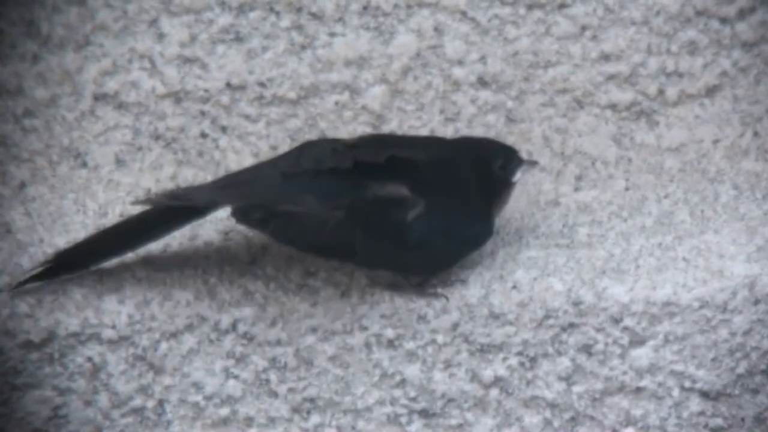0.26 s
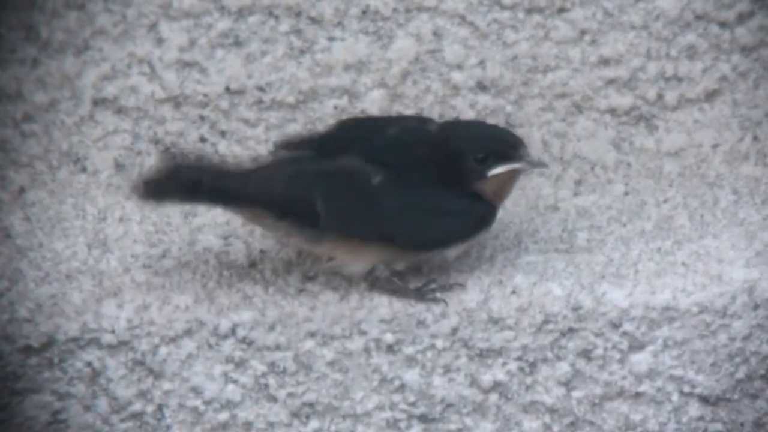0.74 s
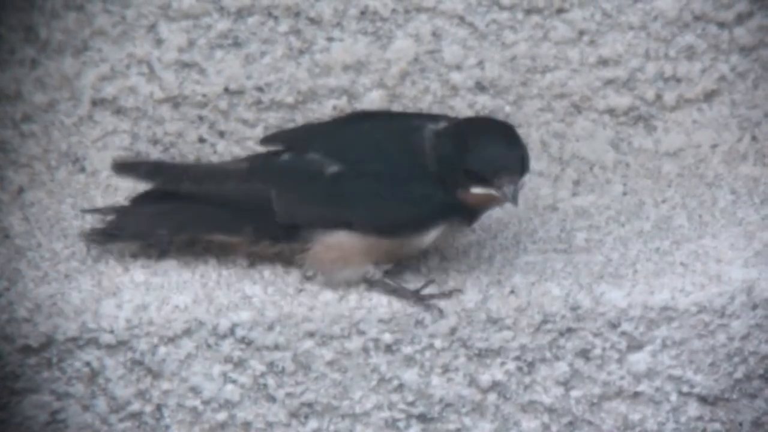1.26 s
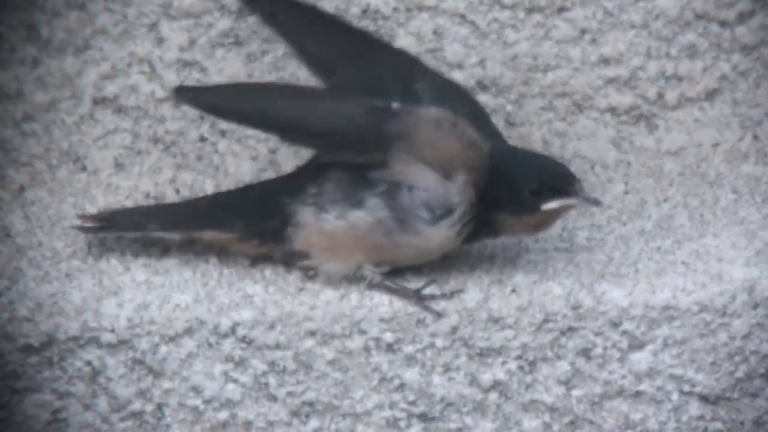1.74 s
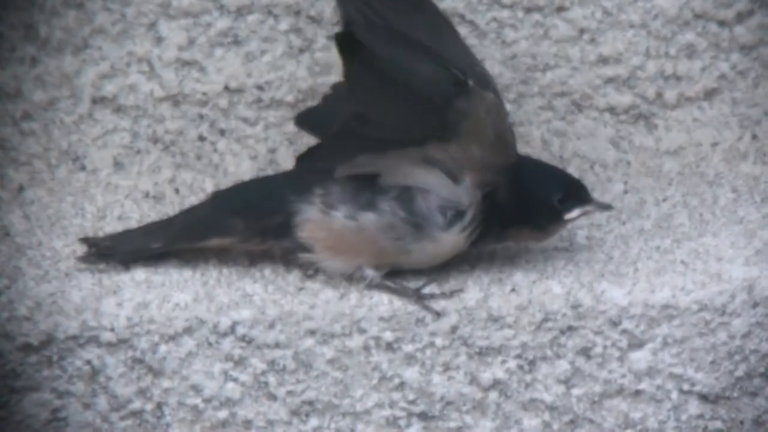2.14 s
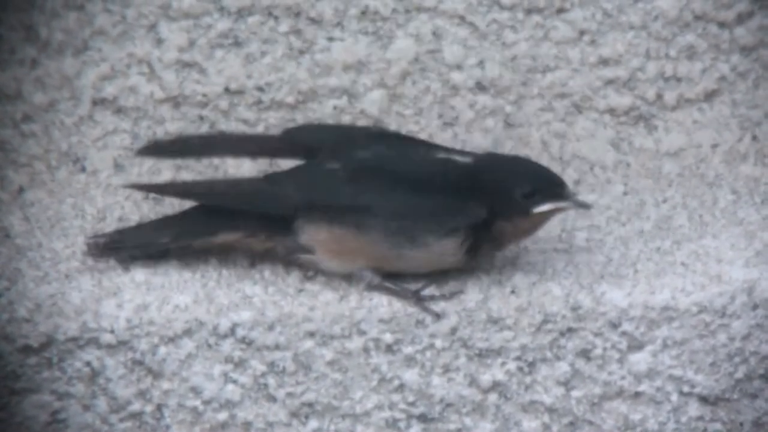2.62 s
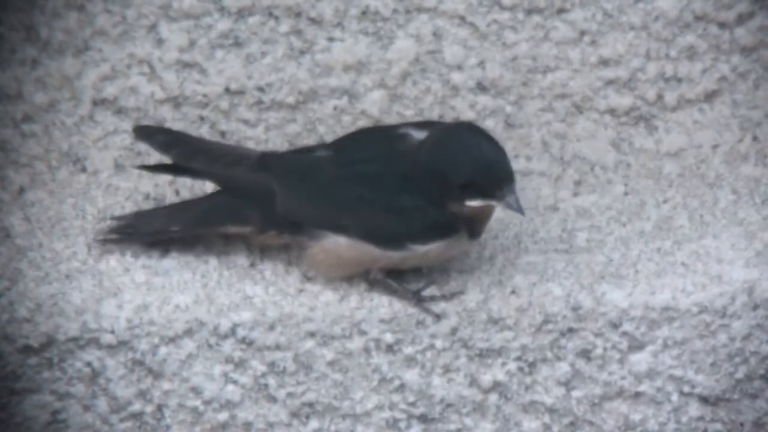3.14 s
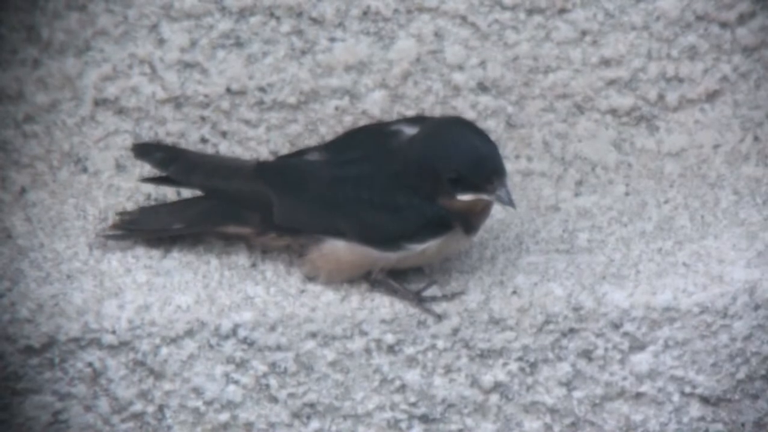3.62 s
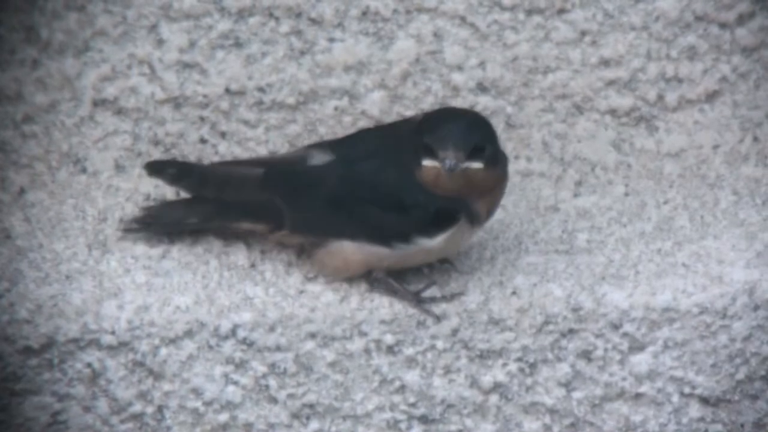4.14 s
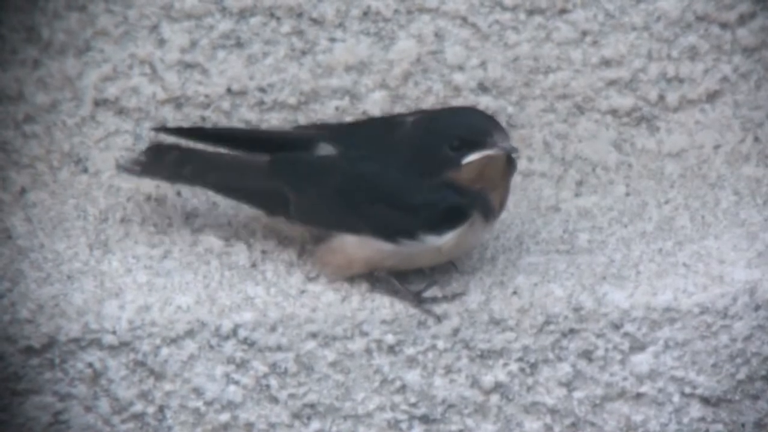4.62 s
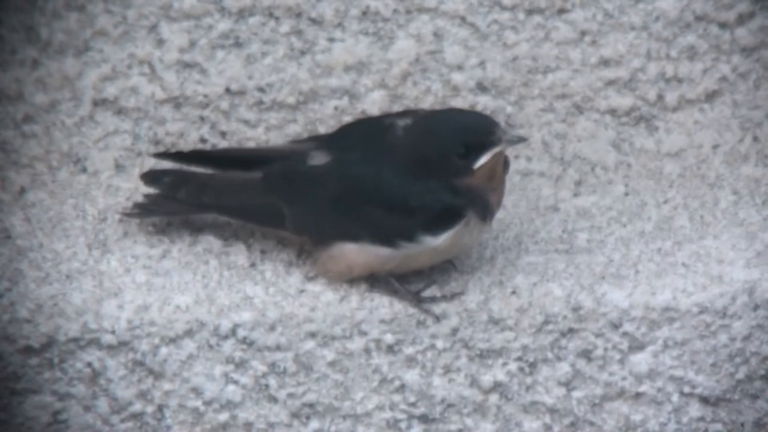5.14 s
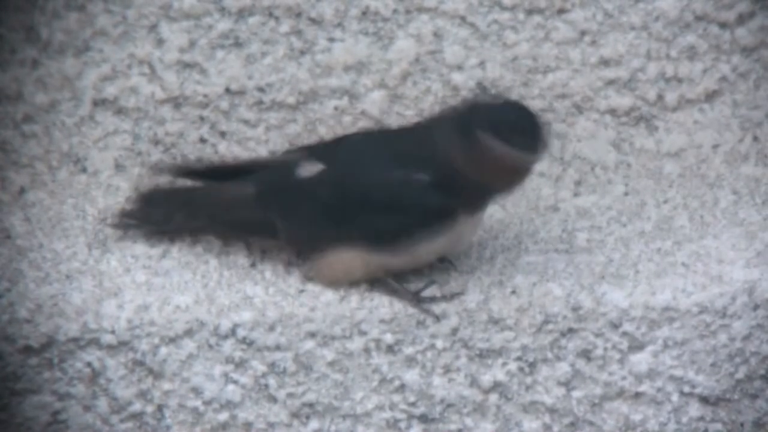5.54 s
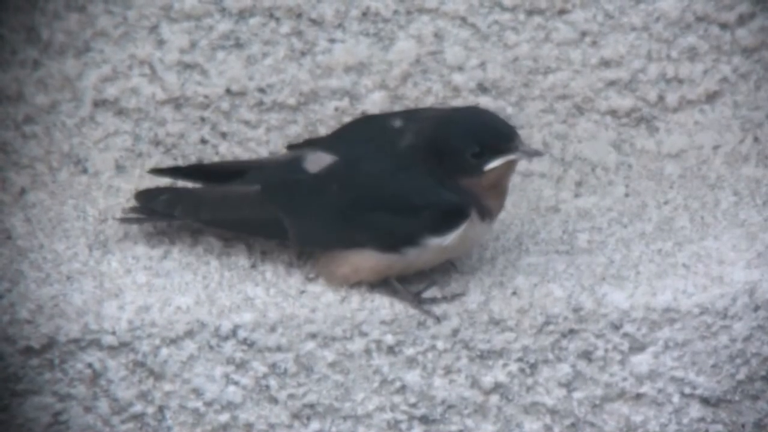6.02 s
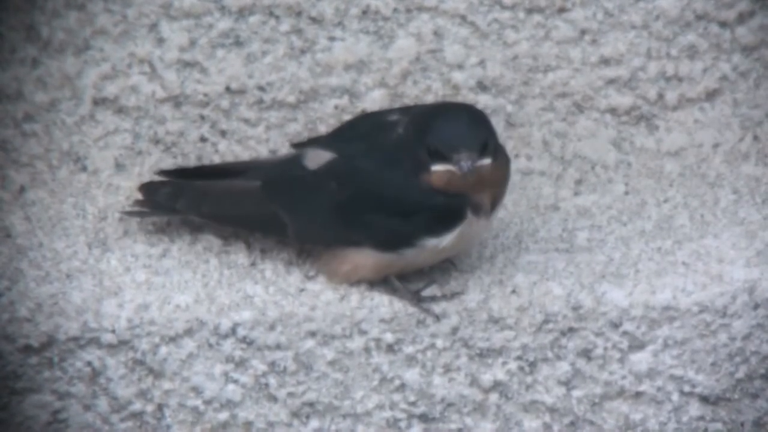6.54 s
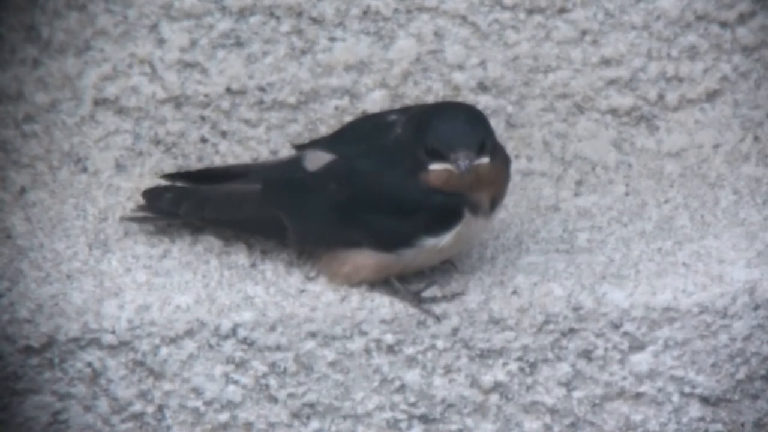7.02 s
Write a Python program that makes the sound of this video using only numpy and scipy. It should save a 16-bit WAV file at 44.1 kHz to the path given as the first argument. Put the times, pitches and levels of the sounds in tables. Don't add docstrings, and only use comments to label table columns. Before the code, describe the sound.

A young swallow gives a quick, high, falling three-note chirp about once a second over steady bright water hiss and faint distant bird whistles.

```python
import sys
import numpy as np
from scipy import signal
from scipy.fft import rfft, irfft
from scipy.io import wavfile
from scipy.ndimage import uniform_filter1d

SR = 44100
rng = np.random.default_rng(int(sys.argv[2]) if len(sys.argv) > 2 else 0)


def digitize_waveform(pressure):
    field = np.atleast_2d(pressure).T
    bounded = np.clip(field, -1, 1)
    quanta = np.round(bounded * 32767).astype(np.int16)
    wavfile.write(sys.argv[1], SR, quanta)


def gain_from_decibels(decibels):
    exponent = np.asarray(decibels, float) / 20
    return 10 ** exponent


N = 320607
TIME = np.arange(N) / SR


def colour(points, peaks=()):
    hz = np.maximum(np.arange(N // 2 + 1) * SR / N, 1)
    point_hz, point_db = np.transpose(points)
    db = np.interp(np.log(hz), np.log(point_hz), point_db)
    for centre_hz, width_hz, top_db in peaks:
        db = db + top_db * np.exp(-(2 * (hz - centre_hz) / width_hz) ** 2)
    noise = irfft(rfft(rng.standard_normal(N)) * gain_from_decibels(db), N)
    return noise / noise.std()


def walk(rate, size):
    hold = max(int(SR / rate), 1)
    steps = np.repeat(rng.standard_normal(size // hold + 1), hold)[:size]
    smooth = uniform_filter1d(uniform_filter1d(steps, hold), hold)
    return smooth / np.sqrt(.55)


def add(out, s, sound):
    i = int(s * SR)
    out[i:i + len(sound)] += sound[:len(out) - i]


def tone(hz):
    return 2 * np.pi * np.cumsum(hz) / SR


def bandpass(sound, low_hz, high_hz):
    return signal.sosfilt(signal.butter(2, [low_hz, high_hz], "bandpass", fs=SR, output="sos"), sound)


def drip(hz, db, t60):
    attack = .003
    t = np.arange(int((t60 + attack) * SR)) / SR
    size = np.minimum(t / attack, np.exp(-np.log(1000) * (t - attack) / t60))
    return gain_from_decibels(db) * size * np.sin(tone(hz * (1 + .03 * t / t60)))


# (f/Hz, level/dB per Hz)
WATER_SPECTRUM = [(35, -62), (60, -50), (328, -33.5), (700, -21.3), (1380, -14), (2060, -10), (2600, -4.7),
                  (3010, .9), (3500, -4.2), (3900, -4.4), (5000, -9.8), (8500, -16), (10000, -24.5),
                  (15600, -46.5)]
# (f/Hz, width/Hz, level/dB)
CAVITY_PEAKS = [(6100, 600, -2.8), (6750, 500, 1.4), (7500, 600, -2.6), (8200, 600, 1), (11100, 2200, -2.2)]
# (t/s, level/dB)
FLOW = [(0.0, -32.5), (1.33, -32.5), (2.6, -33), (5.04, -33), (6.82, -31.5), (6.96, -31), (7.27, -31.5)]
# (t/s, length/s, centre f/Hz, level/dB)
SPLASHES = [
    (.9, 0.088, 6500, -38),
    (1.587, 0.071, 3500, -33),
    (6.66, .07, 6950, -38),
    (6.919, 0.13, 6200, -38),
]
# (t/s, f/Hz, peak level/dB, t60/s)
DRIPS = [
    (.335, 2380, -27, .08),
    (2.575, 2350, -31, .05),
    (2.755, 1620, -36, .06),
    (5.604, 2750, -23, .03),
    (1.0315, 3000, -17, .011),
    (6.708, 2850, -21, .035),
    (6.913, 2500, -21, .04),
]


def water():
    hiss = rfft(colour(WATER_SPECTRUM, CAVITY_PEAKS))
    octave = np.log2(np.maximum(np.arange(len(hiss)) * SR / N, 1) / 1000)
    low = 1 / (1 + gain_from_decibels(40 * (octave - 1)))
    high = 1 / (1 + gain_from_decibels(40 * (2.3 - octave)))
    out = np.zeros(N)
    for band, slow_db, quick_db in ((low, .15, .2), (1 - low - high, .4, .8), (high, .4, .7)):
        flicker_db = slow_db * walk(2.75, N) + quick_db * walk(18, N)
        out += irfft(hiss * band, N) * gain_from_decibels(flicker_db)
    out = out * gain_from_decibels(np.interp(TIME, *np.transpose(FLOW)) + 2.5)

    for s, length, hz, db in SPLASHES:
        gust = bandpass(rng.standard_normal(int(length * SR)), hz * 0.74, hz * 1.25)
        add(out, s, gain_from_decibels(db) * gust / gust.std() * np.hanning(len(gust)))
    for when, pitch, size in rng.random((150, 3)):
        add(out, when * N / SR, drip(2750 + 500 * pitch, -35 - 2.2 * np.log(size + .01), .02))
    for s, hz, db, t60 in DRIPS:
        add(out, s, drip(hz, db, t60))
    return out


def hum():
    return gain_from_decibels(-70.5 + 1.6 + 2.7 * walk(4, N)) * np.sin(2 * np.pi * 498 * TIME)


# (f/Hz, level/dB per Hz)
SIDE_SPECTRUM = [(60, -50), (3000, -17), (5000, -8.5), (8500, -3.5), (11000, -11.5), (15600, -18.5)]


def side_hiss():
    return gain_from_decibels(-55.5) * colour(SIDE_SPECTRUM)


def yard(sound):
    t60_s, tail_db = .5, -6.5
    t = np.arange(int(.4 * SR)) / SR
    decay = np.exp(-np.log(1000) * t / t60_s) * np.minimum(t / .008, 1)
    tail = rng.standard_normal(len(t)) * decay
    response = np.append(1, gain_from_decibels(tail_db) * tail / np.linalg.norm(tail))
    return signal.fftconvolve(np.append(sound, 0 * t), response)[:len(t)]


# (t/s, length/s, first f/Hz, last
# f/Hz, level/dB)
WHISTLES = [(.372, 0.018, 4200, 4200, -30), (0.389, 0.033, 3550, 3980, -31.5),
            (1.43, 0.11, 4920, 4200, -41), (1.69, .15, 3900, 3480, -36), (1.84, .03, 4250, 4300, -38),
            (2.28, 0.18, 4280, 3820, -39.5), (3.24, .12, 4450, 5130, -42), (4.085, .028, 3550, 3970, -29),
            (4.32, .17, 5300, 5580, -50), (5.636, 0.0304, 3450, 3980, -30.5), (6.06, .05, 4480, 4340, -38),
            (6.2, 0.048, 3820, 3850, -37), (6.67, .125, 3910, 4130, -35), (6.9, .105, 4130, 4170, -34),
            (6.99, .075, 4170, 3350, -32)]


def far_birds():
    edge_s, bend = 0.011, 1.2
    out = np.zeros(N)
    for s, length, first_hz, last_hz, db in WHISTLES:
        u = np.linspace(0, 1, int(length * SR))
        glide_hz = first_hz + (last_hz - first_hz) * u ** bend
        pitch = glide_hz * (1 + 0.0044 * walk(139, len(u)))
        gate = np.minimum(np.minimum(u, 1 - u) / min(edge_s / length, .5), 1)
        shimmer_db = db + 3 + 1.7 * walk(90, len(u))
        add(out, s, yard(gate * gain_from_decibels(shimmer_db) * np.sin(tone(pitch))))
    return out


def upper_voice(hz, db):
    v = np.linspace(-1, 1, int(0.024 * SR))
    phase = tone(hz * (1 - 0.033 * v))
    haze = walk(1300, len(v)) * np.sin(phase) + walk(1300, len(v)) * np.cos(phase)
    return gain_from_decibels(db) * np.cos(np.pi * v / 2) * (.6 * haze + .6 * np.sin(phase))


def wall(note, db):
    t = np.arange(-.015, .015, 1 / SR)
    copies = rng.standard_normal(len(t)) * np.exp(-np.abs(t) / .0045)
    held = note * np.hanning(len(note)) ** .5
    back = signal.fftconvolve(held, copies)[len(t) // 3:]
    return gain_from_decibels(db + 2.3) * back * np.linalg.norm(note) / np.linalg.norm(back)


# (t/s, first, second and third note level/dB, depth of the dips within the notes/dB)
CHIRPS = [
    (.578, -19.5, -17.5, -21, -10),
    (1.938, -21.5, -15.5, -22.5, -2),
    (2.954, -22.5, -18, -22.5, -10),
    (3.965, -21, -16, -25.5, -8),
    (5.16, -22, -15.5, -25, -13),
    (6.314, -18.5, -18.5, -22, -6),
]
# (pitch ratio, swell of first note/dB, swell of second note/dB, upper voice level/dB)
VOICING = [(1.003, 2, 1, 5), (.993, 8, -5, 4), (1.002, 3, -2, 2.5), (.99, 3, 0, 1.5), (.984, -2, -6, 5),
           (1.006, 2, 1, 3.5)]
FACING = [(-36, -35, -36, -41), (-31, -39, -31.5, -35), (-35, -36, -30, -34), (-35, -38, -30, -38),
          (-38, -36, -29, -41), (-32, -35, -31.5, -41)]
# (t/s in the call, f/Hz, share of dip depth, dip every share of length)
STEPS = [
    (0, 5035, 0.76, 0.73),
    (.03, 4454, 0.94, .37),
    (.057, 3925, .25, .35),
]
GLIDES = [(0.171, 0.1195, 0.0078, 0.257), (0.098, 0.073, .075, .01), (0.1004, 0.293, -0.0074, .01)]
GATES = [(0.17, 0.14), (0.14, 0.15), (.2, .12)]
# (length/s, octave level/dB)
SHAPES = [(0.03, -33), (0.023, -24), (0.0262, -21.5)]
RASP_DB = [-10, -10, -13]
# (lead t/s, f/Hz, level/dB)
UPPER = [(0.0096, 5950, -36.5), (0.007, 6000, -40.5), (0.0027, 5850, -35)]
WALL_S = [.031, .078, .121, .155]
WALL_TILT_DB = [-3, -2.5, -.5, -1]


def chick_note(k, pitch_ratio, db, swell_db, dip_db):
    _, hz, dip_share, every = STEPS[k]
    scoop, rise, sag, drop = GLIDES[k]
    opening, closing = GATES[k]
    length, octave_db = SHAPES[k]
    u = np.linspace(0, 1, int(length * SR))
    glide = 1 - scoop * np.exp(-(u / rise) ** 2) - sag * (u - .5) - drop * u ** 7
    phase = tone(hz * pitch_ratio * glide * (1 + 0.01 * walk(420, len(u))))
    gate = np.clip(np.minimum(u / opening, (1 - u) / closing), 0, 1)
    nearest_dip = every * np.maximum(np.round(u / every), 1)
    dip = np.clip(1 - np.abs(u - nearest_dip) / .12, 0, 1)
    effort_db = db + swell_db * (u - .5) / .7 + dip_db * dip_share * dip + 1.7 * walk(500, len(u))
    breath = walk(1500, len(u)) + walk(4500, len(u))
    rasp = gain_from_decibels(RASP_DB[k]) * breath * np.cos(phase)
    voice = np.sin(phase) + rasp + gain_from_decibels(octave_db) * np.sin(2 * phase)
    return gate * gain_from_decibels(effort_db) * voice, gate * np.sin(phase)


def chick():
    out = np.zeros(N)
    for chirp, voicing, facing_db in zip(CHIRPS, VOICING, FACING):
        start, *levels_db, dip_db = chirp
        pitch_ratio, *swells_db, upper_db = voicing
        swells_db = swells_db + [8.5]
        for k, (db, swell_db) in enumerate(zip(levels_db, swells_db)):
            s = start + STEPS[k][0]
            note, bare = chick_note(k, pitch_ratio, db, swell_db, dip_db)
            add(out, s, yard(note))
            for delay, tilt_db, wall_db in zip(WALL_S, WALL_TILT_DB, facing_db):
                echo_db = wall_db + k * tilt_db + 0.5 * rng.standard_normal()
                add(out, s + delay - .005, wall(bare, echo_db))
            lead, puff_hz, puff_db = UPPER[k]
            add(out, s - lead - .01, yard(upper_voice(puff_hz, puff_db + upper_db)))
    return out


def scene():
    mid = water() + hum() + far_birds() + chick()
    side = side_hiss()
    return np.array([mid + side, mid - side])


def roll_off(x):
    return signal.sosfilt(signal.butter(12, 15740, fs=SR, output="sos"), x)


def record(dry):
    ceiling = 0.27
    flattened = dry / (1 + np.abs(dry / ceiling) ** 14) ** (1 / 14)
    squash = bandpass(flattened - dry, 1500, 14500)
    return roll_off(dry + squash)


dry = scene()
out = record(dry)
digitize_waveform(out)
```